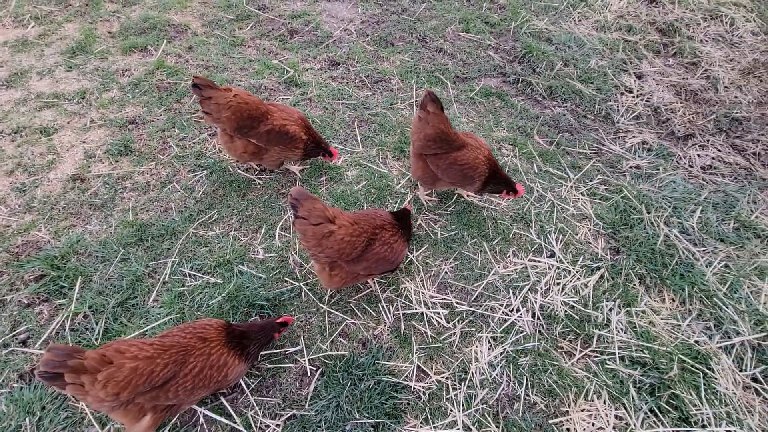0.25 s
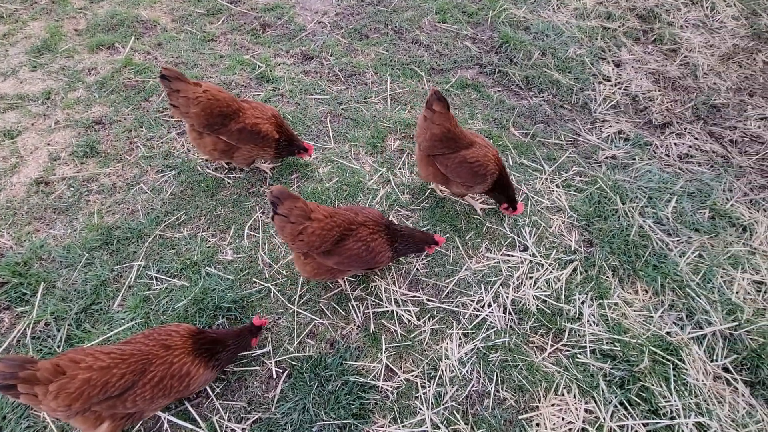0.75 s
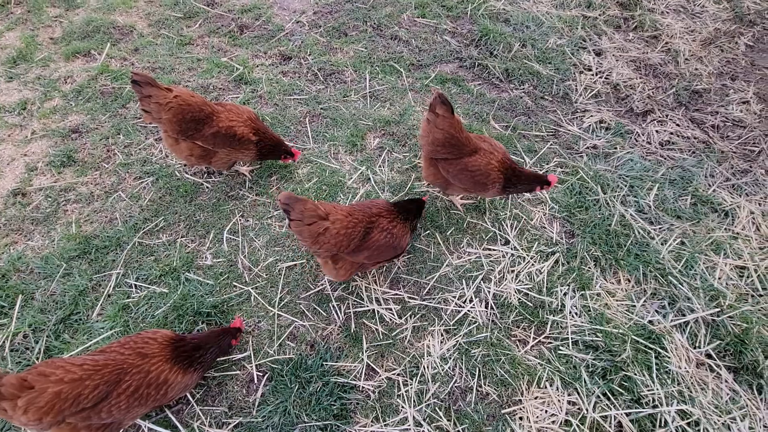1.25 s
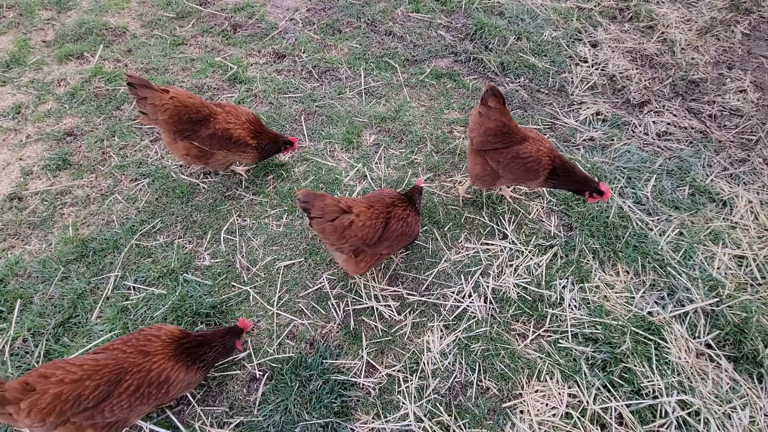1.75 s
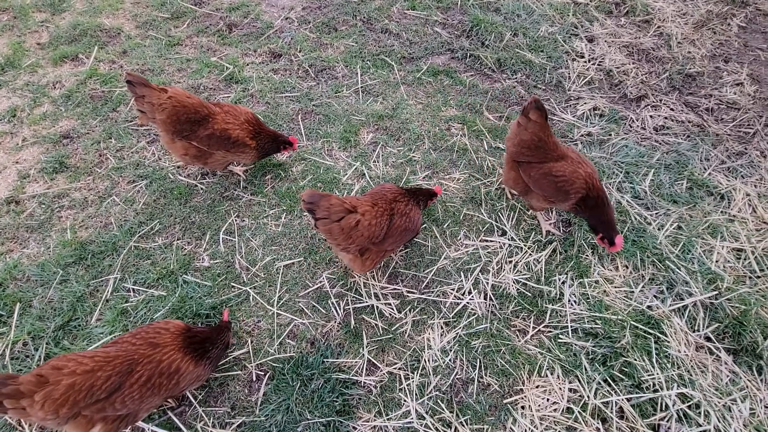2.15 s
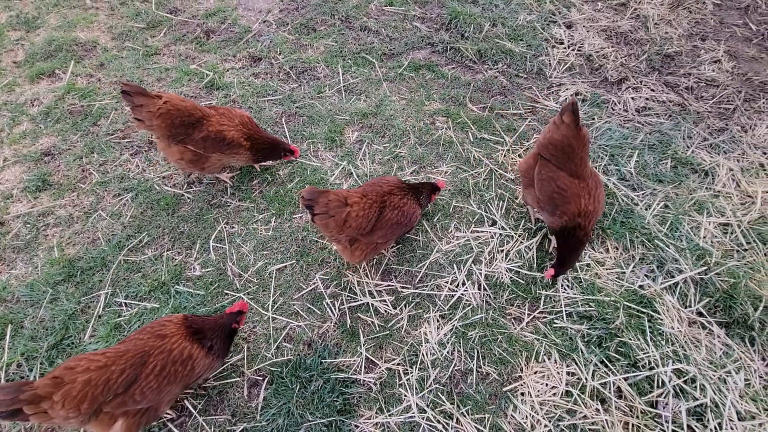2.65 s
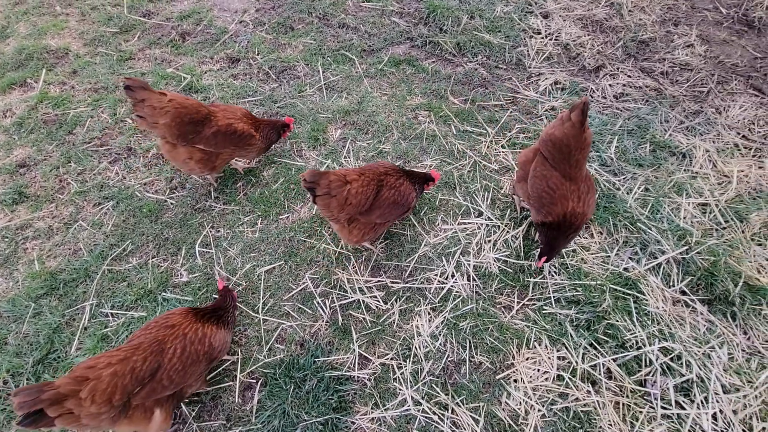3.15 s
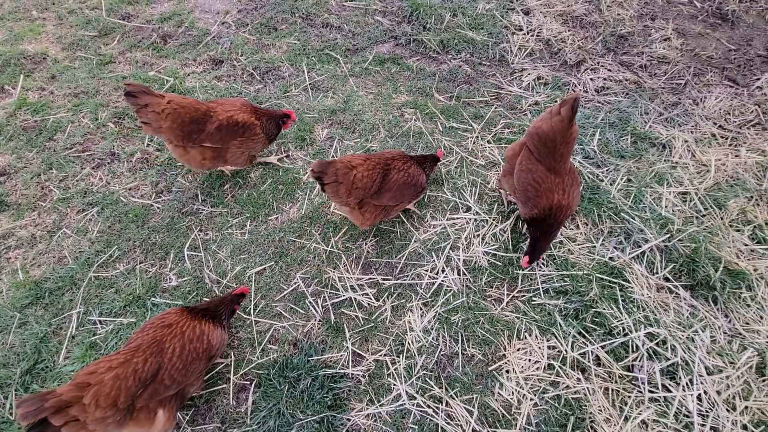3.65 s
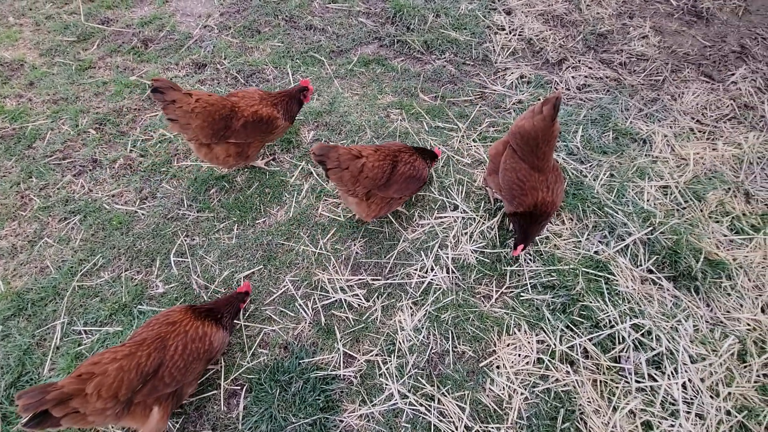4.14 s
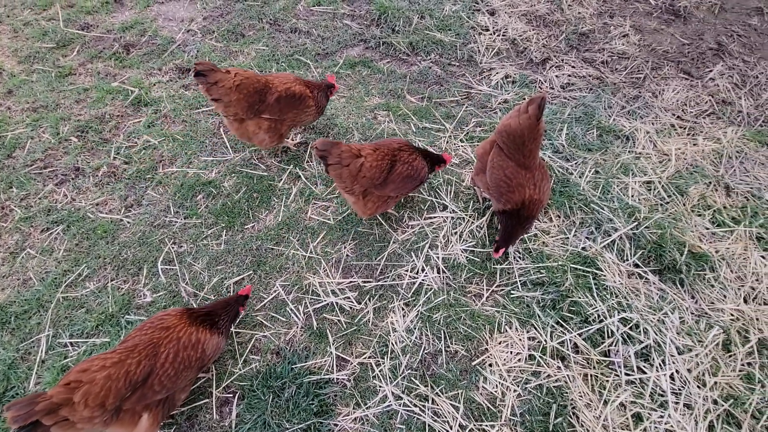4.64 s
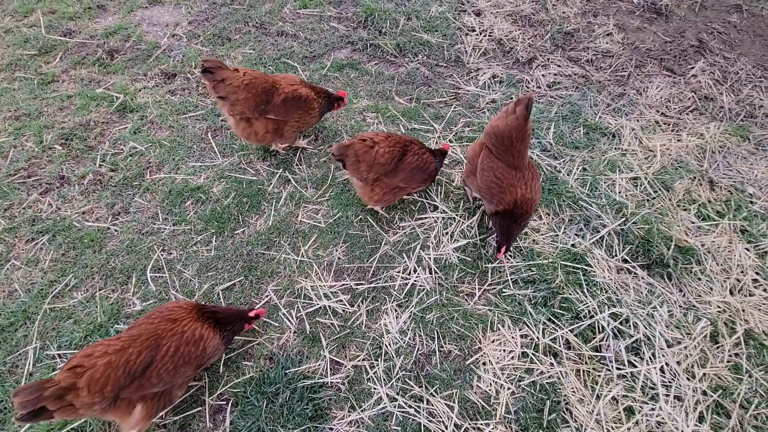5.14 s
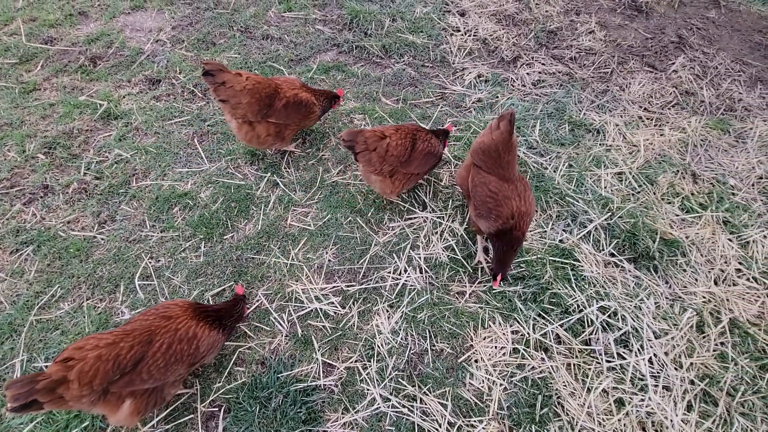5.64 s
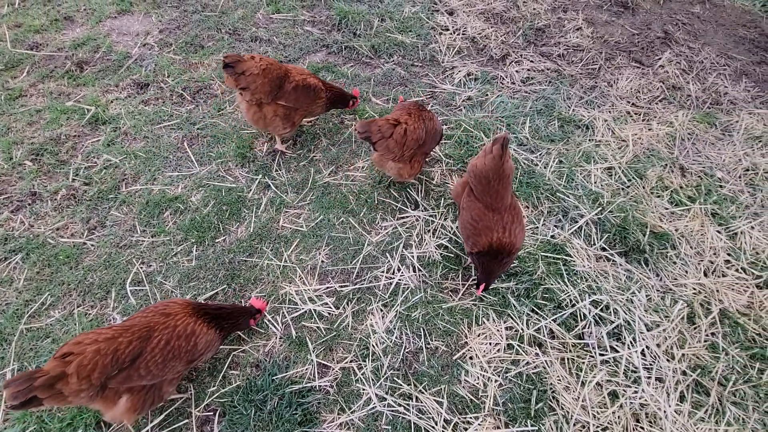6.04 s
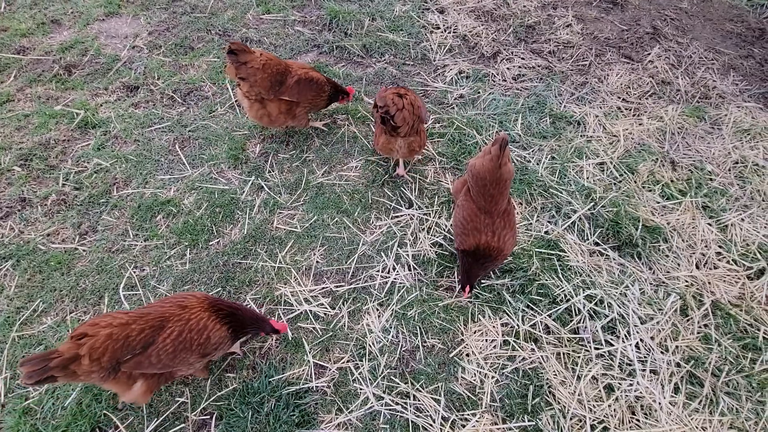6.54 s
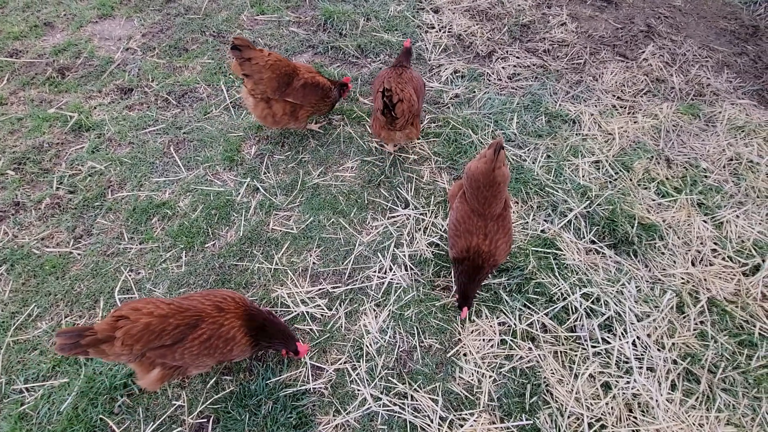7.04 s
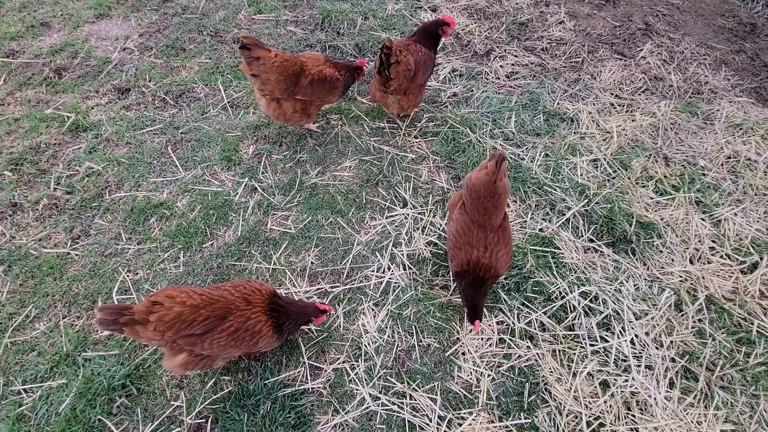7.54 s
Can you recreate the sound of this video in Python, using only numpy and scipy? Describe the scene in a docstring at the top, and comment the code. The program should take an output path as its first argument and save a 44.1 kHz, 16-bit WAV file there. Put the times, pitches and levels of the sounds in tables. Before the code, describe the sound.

Outdoors, close to hens foraging in dry straw, heard in stereo with almost no echo. From 0 to 1.5 seconds crisp stalk snaps and papery rustling come thickly, the sharpest near 0.6, with light beak taps and soft hummed murmurs at 0.3 and 0.8. At about 1.9 and 2.1 two short, low, throaty clucks stand out, the first dipping then rising. From 2.4 to 5 the pecking is sparser: separate ticks, small crackles, dull taps, tiny grunts near 3.6 and 4.3. Throughout, a distant engine drones low and steady, near 97 hertz, over faint far rumble and a thin hiss that fades after the opening; the drone swells and gains overtones around 5.3 to 6.1. Brighter snaps return around 6.2, 6.7 and 7.3, and soft rustling continues to the end near 7.8.

```python
"""Hens forage on dry straw and grass: two short clucks, a few soft murmurs, tapping beaks, snapping and rustling stalks.
Clucks are pulses and breath sent through a throat; murmurs are hums; taps set two resonances ringing.
Straw is made of many short noise bursts, coloured by resonances, with a scrape of claws on soil below.
A distant engine drones at steady speed as a stack of tones, over far rumble and a faint hiss of filtered noise.
The two microphone ports agree in the bass and drift apart in phase above it."""
import sys
import numpy as np
from scipy import signal
from scipy.fft import rfft, irfft, next_fast_len
from scipy.io import wavfile
from scipy.ndimage import uniform_filter1d, map_coordinates

SR = 44100
rng = np.random.default_rng(int(sys.argv[2]) if len(sys.argv) > 2 else 0)


def natural_amplitude(level_db):
    """Convert a level in decibels to a linear amplitude factor, elementwise."""
    exponent = np.asarray(level_db, float) / 20
    return 10 ** exponent


def master_out(mix):
    """Clip the mix to full scale and print it as 16-bit PCM to the path in sys.argv[1]."""
    frames = np.transpose(np.atleast_2d(mix))
    ceiling = np.clip(frames, -1, 1)
    pcm = np.round(ceiling * 32767).astype(np.int16)
    wavfile.write(sys.argv[1], SR, pcm)


N = 343715  # length in samples


def unit(x):
    """Scale to rms 1."""
    return x / np.sqrt(np.mean(x ** 2) + 1e-20)


def along(points, hz):
    """Read a curve of (Hz, value) points, drawn on a log frequency axis."""
    f, v = np.transpose(points)
    return np.interp(np.log(hz + 1), np.log(f + 1), v)


def curves(rows):
    """Draw one value per sample for each column after the time."""
    s, *cols = np.transpose(rows)
    return [np.interp(np.arange(N) / SR, s, c) for c in cols]


def wobble(rate):
    """A smooth random curve through rate random points a second."""
    points = rng.standard_normal(int(N * rate / SR) + 4)
    return map_coordinates(points, [np.arange(N) * rate / SR])


def filtered(x, response):
    """Colour x with a complex response of frequency."""
    m = next_fast_len(x.shape[-1] + 8192)  # spare room for the ringing
    spectrum = rfft(x, m) * response(np.fft.rfftfreq(m, 1 / SR))
    return irfft(spectrum, m)[..., :x.shape[-1]]


def resonances(modes):
    """Response of things that ring at (Hz, width Hz, dB), with signs that alternate."""
    def response(f):
        total = 0
        for k, (centre, width, db) in enumerate(modes):
            damping = 1j * f * width
            total = total + (-1) ** k * natural_amplitude(db) * damping / (centre * centre - f * f + damping)
        return total
    return response


def sides(pan_db, lead=0):
    """Complex left and right gains whose mean has size 1; the right leads by lead radians."""
    left = natural_amplitude(pan_db / 2) * np.exp(-.5j * lead)
    right = natural_amplitude(-pan_db / 2) * np.exp(.5j * lead)
    pair = np.array([left, right])
    return pair / np.abs(pair.mean(0))


def add(out, s, piece):
    """Mix a stereo piece in at time s."""
    i = round(s * SR)
    out[:, i:i + piece.shape[1]] += piece[:, :N - i]


# the hen's windpipe and beak: f/Hz, width/Hz, level/dB
WINDPIPE = [(735, 134, 6), (1120, 160, 2.5), (1770, 190, -10.5), (1940, 210, -25)]
# a side pocket that swallows one band: f/Hz, width/Hz
SIDE_POCKET = (1540, 170)
# the open beak's faint band, passed twice: f/Hz, width/Hz, level of one pass/dB
OPEN_BEAK = [(3900, 1100, -12)]
# the air sacs, which ring low: f/Hz, width/Hz, level/dB
AIR_SACS = [(371, 34, -4.5)]


def throat(f):
    """The windpipe passes little below its first and above its last resonance; beak and air sacs add bands."""
    low_edge = (1j * f / (420 + 1j * f)) ** 2
    high_edge = 1 / (1 + 1j * f / 1900 - (f / 1900) ** 2) ** 2
    centre, width = SIDE_POCKET
    gap = centre * centre - f * f
    notch = (gap + .15j * f * width) / (gap + 1j * f * width)
    pipe = resonances(WINDPIPE)(f) * low_edge * high_edge * notch
    return pipe + resonances(OPEN_BEAK)(f) ** 2 + resonances(AIR_SACS)(f)


# two clucks, each a list of points: t/s, pitch before shaking f/Hz, effort level/dB, roughness 0-1
CLUCK_POINTS = [
    [(1.9255, 198, -21.5, .15), (1.934, 195, -26.5, .25), (1.944, 172, -29.5, .35), (1.956, 200, -27.5, .3),
     (1.972, 240, -27.5, .25), (1.989, 270, -31, .25)],
    [(2.105, 255, -30.5, .45), (2.117, 275, -33, .45), (2.125, 292, -26, .2), (2.136, 283, -23.5, .1),
     (2.147, 281, -27, .15), (2.154, 280, -31, .2)],
]
# how far the right port leads for a hen's voice: f/Hz, lead/radians
HEN_LEAD_CURVE = [(200, 0), (330, .5), (600, 1.5), (850, 1.8), (1250, 2.5), (1750, 3.1)]
CLUCK_ATTACK_S, CLUCK_RELEASE_S = .002, .008  # time to rise from and sink to 20 dB under
CHEST_DB, CHEST_LAG_S = -22.5, 0.0084  # the chest takes up the effort weaker and later


def clucks():
    """Uneven pulses of the syrinx, with breath gated once a cycle, pass the throat; the chest hums the fundamental."""
    voice, chest = np.zeros(N), np.zeros(N)
    for rows in CLUCK_POINTS:
        s, *cols = np.transpose(rows)
        t = np.arange(round((s[0] - CLUCK_ATTACK_S) * SR), round((s[-1] + .04) * SR))
        pitch, db, rough = (np.interp(t / SR, s, c) for c in cols)
        early = np.maximum(s[0] - t / SR, 0) / CLUCK_ATTACK_S
        late = np.maximum(t / SR - s[-1], 0) / CLUCK_RELEASE_S
        effort = natural_amplitude(db - 20 * (early + late))
        # roughness shakes the pitch and makes the pulses uneven
        cycle = np.cumsum(pitch * (1 + .15 * rough * wobble(200)[t])) / SR + .65
        pulse = np.diff(np.floor(cycle), prepend=0) * natural_amplitude(3.0 * rough * rng.standard_normal(len(t)))
        breath = rng.standard_normal(len(t)) * np.exp(-3.5 * (cycle % 1))
        voice[t] = effort * (np.sqrt(1 - rough ** 2) * unit(pulse) + rough * unit(breath))
        keep = np.exp(-1 / (CHEST_LAG_S * SR))
        lagging = signal.lfilter([1 - keep], [1, -keep], effort)
        chest[t] = natural_amplitude(CHEST_DB) * lagging * np.sqrt(2) * np.sin(2 * np.pi * cycle)
    voice = filtered(voice, throat) - chest
    # scatter off the ground and nearby fences
    t = np.arange(SR // 8) / SR
    yard = rng.standard_normal(len(t)) * natural_amplitude(-60 * t / 0.16) * (t > .006)
    voice = voice + natural_amplitude(-20.0) * signal.fftconvolve(voice, yard / np.linalg.norm(yard))[:N]
    port_gain = natural_amplitude(np.array([[-2.5], [2.5]]))
    return filtered(voice, lambda hz: port_gain * np.exp(.5j * np.outer([-1, 1], along(HEN_LEAD_CURVE, hz))))


# closed-beak murmurs, starting 5 ms before t: t/s, level/dB, base pitch f/Hz, left-right level/dB, length/s
MURMUR_NOTES = [(0.303, -57.5, 377, -5.5, 0.038), (0.782, -54, 353, -3, 0.041), (3.548, -59, 263, 1, 0.025),
                (3.589, -59.5, 279, -3.5, 0.032), (4.319, -52.5, 333, -4, 0.013)]


def murmurs():
    """Short hummed grunts of a few cycles, with two weaker overtones, falling in pitch and shaky."""
    out = np.zeros((2, N))
    for s, db, hz, pan_db, length in MURMUR_NOTES:
        u = np.linspace(0, 1, round(length * SR))
        shake = np.interp(u * length * 150, np.arange(20), rng.standard_normal(20))
        turns = 2 * np.pi * np.cumsum(hz * (1.06 - 0.056 * u + 0.12 * shake)) / SR
        hum = np.exp(1j * turns) + 0.18 * np.exp(2j * turns) + 0.092 * np.exp(3j * turns)
        note = np.sin(np.pi * u ** 0.66) * hum
        add(out, s - .005, natural_amplitude(db) * np.imag(sides(pan_db, along(HEN_LEAD_CURVE, hz))[:, None] * note))
    return out


# beak taps on hard ground and stems: t/s, level/dB, main ring f/Hz, second ring f/Hz, left-right level of the rings/dB
BEAK_TAPS = [(0.021, -55, 630, 3460, 3), (0.294, -56, 1840, 781, -6), (0.564, -52, 910, 3000, -5),
             (0.605, -53.5, 3180, 641, -8), (0.781, -50.5, 1450, 1860, -11), (0.803, -54, 1440, 1820, -2),
             (0.87, -50.5, 970, 660, 3), (1.071, -51.5, 1110, 1640, 2), (1.095, -53, 650, 1610, 3),
             (1.33, -51, 1840, 1050, 1), (1.534, -51, 1180, 1580, 3), (1.657, -55, 1430, 1860, -9),
             (2.377, -43, 2980, 1150, 6), (2.715, -44.5, 1340, 1900, -1), (3.012, -57, 1120, 2110, 1),
             (3.096, -54.5, 700, 1630, 1), (3.611, -47.5, 766, 3590, -7), (4.023, -56, 1180, 2950, 12),
             (4.158, -59, 1130, 3530, -10), (4.313, -57.5, 2930, 934, -4), (4.496, -56.5, 2100, 1400, -5),
             (4.835, -59.5, 1540, 1060, -4), (5.091, -53.5, 1260, 2040, -9), (5.105, -70, 1880, 1300, -5),
             (5.39, -60.5, 1470, 1080, 0), (6.287, -55, 660, 3280, 3), (6.502, -63, 1660, 668, 12),
             (6.744, -50.5, 1710, 1570, 8), (7.162, -60, 1300, 1870, 2), (7.274, -48, 1270, 2900, 2),
             (7.288, -55, 1260, 2570, -11), (7.335, -55.5, 1100, 2120, -3), (7.595, -57.5, 1450, 645, -2),
             (7.618, -61, 1170, 3400, -5)]
SECOND_RING_DB = -5.5  # relative to the main ring
CONTACT_S = .0008  # how softly a tap sets in


def pecks():
    """Each tap is a brief crunch and two resonances that ring and die away."""
    out, t = np.zeros((2, N)), np.arange(SR // 20) / SR
    for s, db, main_hz, second_hz, pan_db in BEAK_TAPS:
        lead = rng.uniform(0.71, 2.2)  # radians
        # each part fades by 60 dB in the seconds given
        ring = natural_amplitude(-60 * t / 0.026) * np.exp(2j * np.pi * main_hz * t)
        ring = ring + natural_amplitude(SECOND_RING_DB - 60 * t / 0.024) * np.exp(2j * np.pi * second_hz * t)
        crunch = rng.standard_normal((2, len(t))) * natural_amplitude(-60 * t / 0.021)
        crunch = filtered(crunch, resonances([(main_hz, 900, 11), (second_hz, 1300, SECOND_RING_DB + 16)]))
        tap = np.imag(sides(pan_db, lead)[:, None] * ring) + crunch
        add(out, s, natural_amplitude(db) * tap * (1 - np.exp(-t / CONTACT_S)))
    return out


# snapping stalks: t/s, peak level of the bright part/dB, body relative level/dB, left-right level/dB
STALK_SNAPS = [(0.0225, -34.5, -26, -1), (0.265, -46, 3, -4), (0.31, -42, -2, 0), (0.3306, -38, -12, 4),
               (0.562, -28.5, -11, -8), (0.572, -30, -15, -5), (0.5775, -33, -24, -7),
               (0.6075, -20, -18, 5), (0.6105, -33, -11, 9), (0.7494, -42, -2, -18), (0.922, -41, -27, -10),
               (0.9457, -41, -26, -13), (0.9817, -45, -22, -11), (1.007, -40, -24, -8),
               (1.024, -36, -23, -7), (1.1064, -30, -9.5, -7.5), (1.1578, -38.5, -28, -12),
               (1.331, -45, 0, -4), (1.355, -44, -18, 1), (1.3684, -34, -21, 2), (1.4245, -29, -17, 0),
               (1.8347, -41, -11, 10), (1.858, -27, -20, 1), (2.0446, -41.5, -10, -14), (2.123, -37, -8, 0),
               (2.365, -35, -26, 4), (2.378, -41, 1.5, 4.5), (2.419, -36, -8, -4), (2.7162, -46, -2, -4),
               (2.752, -30, -22, 0), (3.012, -34.5, -5, -3), (3.103, -27.5, -11.5, 2), (3.391, -44, 3, 2),
               (3.425, -32, -6.5, 5), (3.687, -33, -10, 5), (3.919, -39.5, -8.5, -6),
               (4.021, -28, -11.5, 2), (4.031, -31, -13, 2), (4.3323, -39, -11, 2), (4.357, -37, -8, 4),
               (4.367, -31, -12, 2.5), (4.497, -43, 1, -2), (4.6079, -36, -29, 8), (4.8733, -40, -20, 9),
               (4.9356, -40, -12, 2), (5.0715, -37, -26, 9), (5.2275, -34.5, -8.5, 2), (5.504, -45, -2, 1),
               (5.531, -47, -6, -2), (5.6057, -39, -17, 0), (5.805, -33, -29, -4), (5.912, -48, -2, 1),
               (6.1826, -28, -23, -9), (6.2065, -43, -10, 5), (6.226, -45, 0, 3), (6.281, -42, -4.5, 1),
               (6.398, -45, -4, -4), (6.483, -45, -9, 4), (6.502, -44.5, -1.5, 7), (6.651, -35, -20, 8),
               (6.736, -25.5, -8.5, 4), (6.782, -40.5, -5.5, 3), (6.815, -41, -8, 3), (6.8318, -31, -10, 5),
               (6.915, -45, -20, 1), (7.1627, -31, -9.5, 5), (7.2754, -24.5, -4, -1.5),
               (7.3362, -45.5, 3, -3)]
# bright resonances of straw, for snaps and rustle: f/Hz, width/Hz, level/dB
STRAW_BRIGHT = [(12370, 2110, 5), (13700, 2440, 4.5)]
# body resonances of straw, for snaps and rustle: f/Hz, width/Hz, level/dB
STRAW_LOWER = [(3700, 1370, -3.5), (8480, 2250, 0.5)]


def snaps():
    """A stalk breaks in about a millisecond: a noise burst that the ports hear partly alike."""
    out, t = np.zeros((2, N)), np.arange(SR // 150) / SR
    count = len(STALK_SNAPS)
    noise = rng.standard_normal((count, 3, len(t))) * t / .0005 * np.exp(-t / 0.00035)
    # the shared part is upside down in the right port at random
    flip = np.stack([np.ones(count), rng.choice([-1, 1], count)], axis=1)
    bursts = flip[..., None] * noise[:, :1] + 0.54 * noise[:, 1:]
    tops = filtered(bursts, resonances(STRAW_BRIGHT))
    bodies = filtered(bursts, resonances(STRAW_LOWER))
    for (s, db, body_db, pan_db), top, body in zip(STALK_SNAPS, tops, bodies):
        gain = natural_amplitude(db + np.array([[pan_db], [-pan_db]]) / 2)
        snap = top / np.abs(top).max() + natural_amplitude(body_db) * body / np.abs(body).max()
        add(out, s, gain * snap)
    return out


def cracks(per_second, spread_db):
    """Tiny bursts of uneven size, none much above the rest, on a steady bed of noise."""
    size = natural_amplitude(spread_db * np.minimum(rng.exponential(size=N), 3.2))
    hits = (rng.random(N) < per_second / SR) * size
    bursts = signal.lfilter([1], [1, -.93], hits)
    return (unit(bursts) + 1.1) * rng.standard_normal((2, N))


def stalks(count, mid_hz, cycles):
    """Single stalks flicked at random moments, each ringing briefly at its own pitch and place."""
    when, size, pan, phase = rng.random((count, 4)).T
    hz = np.clip(mid_hz * np.exp(0.454 * rng.standard_normal(count)), 2400, 11000)[:, None]
    t = np.arange(SR // 200) / SR
    strength = natural_amplitude(-4.5 * np.log(np.maximum(size, .05)))[:, None]
    envelope = strength * t * hz ** 2.1 * np.exp(-t * hz / cycles)
    at = ((when * N).astype(int)[:, None] + np.arange(len(t))).ravel()
    ports = []
    for gain, shift in [(np.sqrt(pan), np.zeros(count)), (np.sqrt(1 - pan), 2 * np.pi * phase)]:
        ring = envelope * np.sin(2 * np.pi * hz * t + shift[:, None]) * gain[:, None]
        ports.append(np.bincount(at, ring.ravel(), minlength=N)[:N])
    return unit(np.array(ports))


def patchy(x, depth_db):
    """Colour that shifts from moment to moment, as different stalks are touched."""
    z = signal.stft(x, nperseg=256)[2]
    field = uniform_filter1d(rng.standard_normal(z.shape[1:]), size=9, axis=0)  # smooth over pitch
    field = uniform_filter1d(field, size=7, axis=1)  # and over time
    return signal.istft(z * natural_amplitude(depth_db * unit(field)), nperseg=256)[1][:, :N]


# straw crackles in swells, mostly where a foot or beak stirs it; the brief rows beside # snaps are the tails of
# snapping stalks. Swell and fade each span 20 dB: # loudest at t/s, crackle level/dB, swell/s, fade/s, body
# relative level/dB
CRACKLE_SWELLS = [(0.0, -58, .1, 0.46, -13), (.32, -44.5, 0.16, 0.068, -7), (.45, -56, 0.51, 0.26, -8.5),
                  (.6, -52.5, 0.27, 0.083, -13), (.82, -53, 0.5, 0.28, -11), (1.11, -55.5, 0.13, 0.013, -14),
                  (1.36, -49.5, 0.11, 0.045, -7.5), (1.43, -50.5, 0.013, 0.016, -10.5),
                  (1.79, -64, 0.43, 0.14, -6), (1.861, -52.5, 0.12, 0.073, -7), (1.97, -65, .2, .2, -10),
                  (2.06, -55, 0.047, 0.039, -0.5), (2.13, -62, 0.03, 0.11, -3.5),
                  (2.37, -62, 0.075, 0.14, -4.5), (2.51, -62, 0.047, 0.68, -11),
                  (2.75, -55.5, 0.08, 0.11, -2.5), (3.02, -58.5, 0.18, .1, -7),
                  (3.101, -54, 0.071, 0.077, -7.5), (3.43, -53.5, .025, 0.014, -1),
                  (3.71, -60, 0.46, .25, -5.5), (4.039, -48.5, 0.032, 0.013, -16),
                  (4.19, -56.5, 0.12, 0.099, -3.5), (4.36, -61, 0.045, 0.062, -7),
                  (4.6, -60.5, 0.16, 0.068, -8), (4.88, -58.5, .12, 0.13, -7.5), (5.079, -54, 0.079, 0.11, -6),
                  (5.66, -51, 0.082, .15, -5), (5.81, -55, 0.3, 0.063, -5.5), (5.52, -56.5, 0.039, 0.055, -7),
                  (5.91, -58.5, .08, 0.053, -6.5), (6.0, -62, .1, 0.22, -7), (6.179, -59, 0.081, .12, -6),
                  (6.401, -50.5, 0.014, 0.025, -8), (6.659, -56, 0.028, 0.28, -7),
                  (6.83, -52, 0.19, 0.02, -6.5), (7.16, -55, 0.063, 0.09, -6),
                  (7.27, -57.5, 0.13, 0.092, -9.5), (7.53, -62, 0.12, 0.22, -6.5),
                  (7.61, -56.5, 0.14, 0.086, -6), (7.7, -57.5, 0.12, .04, -10)]
# the scrape on soil: f/Hz, width/Hz, level/dB
SOIL_SCRAPE = [(780, 1400, -4.5), (1850, 1420, -0.5)]
BED_DB, BED_BODY_DB = -73.5, -4.5  # the straw is never quite still; its body is relative
SCRAPE_DB, SCRAPE_FOLLOWS = -76.5, 1  # scrape at a crackle of -62 dB, share of the crackle's swings it follows


def rustle():
    """Cracks come in clumps, some only bright, some broad; single stalks ring between and claws scrape the soil."""
    s, db, swell_s, fade_s, rel_db = (c[:, None] for c in np.transpose(CRACKLE_SWELLS))
    late = np.arange(0, N + 64, 64) / SR - s  # one step per 64 samples
    power = natural_amplitude(2 * (db - 20 * np.where(late < 0, -late / swell_s, late / fade_s)))

    def fine(p):
        return np.sqrt(np.interp(np.arange(N) / 64, np.arange(len(p)), p))

    crackle = fine(power.sum(0) + natural_amplitude(2 * BED_DB))
    broad = fine((power * natural_amplitude(2 * rel_db)).sum(0) + natural_amplitude(2 * (BED_DB + BED_BODY_DB)))
    dull = natural_amplitude(SCRAPE_DB) * (crackle / natural_amplitude(-62)) ** SCRAPE_FOLLOWS
    clumps = natural_amplitude(1.52 * wobble(35) + 3.04 * wobble(120))
    both = cracks(350, 3.1)  # shared by all three colours
    top = filtered(clumps * (both + 0.92 * cracks(820, 2.6)), resonances(STRAW_BRIGHT))
    body = unit(filtered(clumps * both, resonances(STRAW_LOWER)))
    body = body + 0.3 * clumps * stalks(count=7000, mid_hz=6220, cycles=0.89)
    scrape = filtered(clumps * (both + 1.93 * cracks(250, 1.3)), resonances(SOIL_SCRAPE))
    top = natural_amplitude(np.array([[-1.8], [1.8]])) * unit(patchy(top, depth_db=2.5))
    return crackle * top + broad * unit(patchy(body, depth_db=3.0)) + dull * unit(scrape)


# distant engine as the air carries it:
# t/s, firing tone level/dB, middle overtones level/dB, high overtones level/dB
ENGINE_DRONE = [(0.0, -49, -90, -90), (0.26, -52, -76.5, -90), (1.19, -56.5, -73.5, -80),
                (1.9, -54.5, -73, -84.5), (2.26, -56.5, -81.5, -90), (2.65, -56.5, -77, -91),
                (2.9, -54.5, -87, -86), (3.56, -51.5, -84, -90), (3.88, -53.5, -85, -84),
                (4.23, -51.5, -71, -80), (4.7, -49.5, -69.5, -87.5), (4.97, -49.5, -67, -80),
                (5.32, -47, -60, -81), (5.6, -45, -62, -78.5), (6.07, -46, -59.5, -78),
                (6.4, -47.5, -64, -82), (6.75, -47.5, -74, -89), (6.96, -47.5, -76, -93),
                (7.12, -47, -68.5, -79), (7.79, -49.5, -67.5, -88)]
# overtones of the shaft: multiple, level relative to group/dB, left-right level/dB, right leads/radians
SHAFT_OVERTONES = [(6, -21, -13, 1.5), (7, -15, -6, 2.2), (8, 2, -8.5, 1.94), (9, -13, -9, 3.4),
                   (10, -27, -8, 3.9), (12, 0, -7.5, 8.82), (14, -4, -3.5, 2.25)]
SHAFT_HZ = 48.65


def engine():
    """Tones at multiples of the shaft speed, the firing tone at twice; moving air makes each overtone waver."""
    firing_db, middle_db, high_db = curves(ENGINE_DRONE)
    turns = 2 * np.pi * np.cumsum(SHAFT_HZ + 0.033 * wobble(1.78)) / SR
    firing = np.real(sides(-1.1, 0.03)[:, None] * np.exp(2j * turns))
    out = natural_amplitude(firing_db + 0.47 * wobble(9.9)) * firing
    for k, db, pan_db, lead in SHAFT_OVERTONES:
        tone = np.exp(1j * (k * turns + 0.097 * wobble(7.4) + rng.uniform(0, 2 * np.pi)))
        group_db = middle_db if k < 12 else high_db
        out += natural_amplitude(group_db + db + 0.6 * wobble(5.4)) * np.real(sides(pan_db, lead)[:, None] * tone)
    return np.sqrt(2) * out  # so that levels are rms


# how alike left and right are, 1 the same, -1 opposite: f/Hz, likeness
PORT_LIKENESS = [(30, 0.41), (90, 0.77), (150, 1), (220, 0.31), (300, 0.41), (450, -0.19), (1500, -0.29),
                 (3000, -0.42), (8000, -0.26)]


def alike(pair, spectrum):
    """Colour two unrelated noises and mix them to the likeness of the ports."""
    def response(hz):
        turn = np.arccos(np.clip(along(PORT_LIKENESS, hz), -1, 1)) / 2
        return spectrum(hz) * np.array([np.cos(turn), np.sin(turn)])
    mid, side = filtered(pair, response)
    return np.array([mid + side, mid - side])


# colour of the far rumble, before levelling: f/Hz, level per Hz/dB
RUMBLE_COLOUR = [(12, -51), (20, -19), (43, -7.5), (76, -2), (100, -10), (125, -13), (151, -18.5),
                 (295, -26), (585, -25.5), (900, -43), (1170, -71), (1980, -120)]
# colour of the hiss, before levelling: f/Hz, level per Hz/dB
HISS_COLOUR = [(410, -70), (700, -1), (987, -7.5), (1360, -2), (2430, -8.5), (3700, -9.5), (6120, -18.5),
               (10400, -13.5), (13000, -1.5), (15900, -5), (16500, -37)]
# the hiss settles after the first seconds: t/s, level/dB
HISS_FADE = [(0.0, -63.5), (1.11, -63.5), (2.41, -68.5), (7.79, -71.5)]
RUMBLE_DB, RUMBLE_FOLLOWS = -57.5, 0.11  # mean level, share of the engine's swell it follows


def distance():
    """Far traffic rumble in slow lumps and a smooth hiss, both filtered noise, a little louder on the right."""
    rumble = unit(alike(rng.standard_normal((2, N)), lambda hz: natural_amplitude(along(RUMBLE_COLOUR, hz))))
    hiss = unit(alike(rng.standard_normal((2, N)), lambda hz: natural_amplitude(along(HISS_COLOUR, hz))))
    swell_db = curves(ENGINE_DRONE)[0]
    rumble_db = RUMBLE_DB + RUMBLE_FOLLOWS * (swell_db - swell_db.mean()) + 1.7 * wobble(4.5)
    far = natural_amplitude(rumble_db) * rumble + natural_amplitude(curves(HISS_FADE)[0]) * hiss
    return far * natural_amplitude(np.array([[-.6], [.6]]))


def scene():
    """Everything in the yard, added up."""
    return clucks() + murmurs() + pecks() + snaps() + rustle() + engine() + distance()


def top_cut(x):
    """Nothing passes above the cut-off."""
    return signal.sosfilt(signal.butter(12, 16820, fs=SR, output="sos"), x)


def record(dry):
    """The band limit of the recorder: the treble drops just below 16 kHz, with nothing from 16.8 kHz up."""
    def band_limit(hz):
        return np.clip((16000 - hz) / 250, .03, 1) * (hz < 16800)
    mix = filtered(dry, band_limit)
    return top_cut(mix)


dry = scene()
out = record(dry)
master_out(out)
```